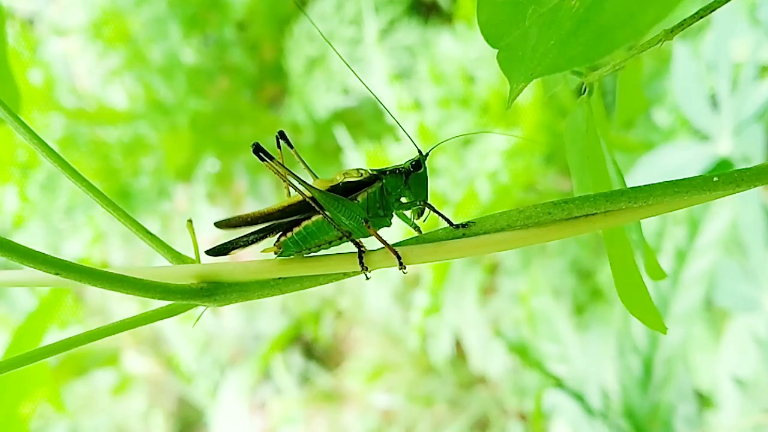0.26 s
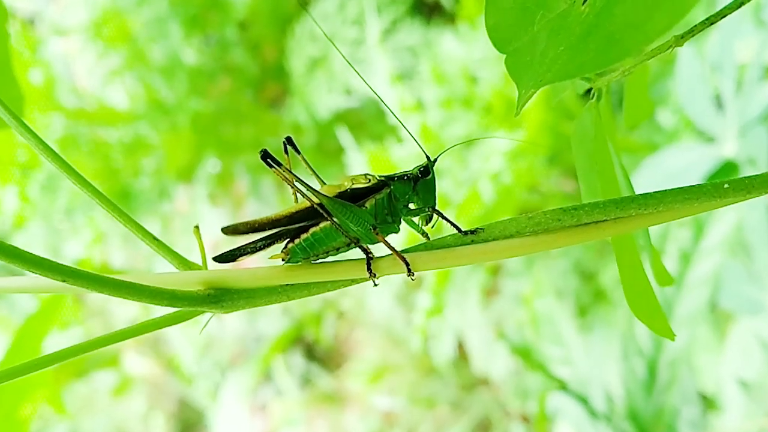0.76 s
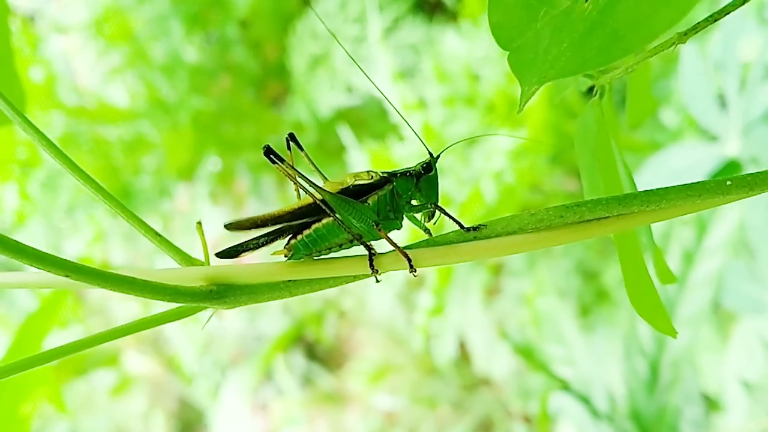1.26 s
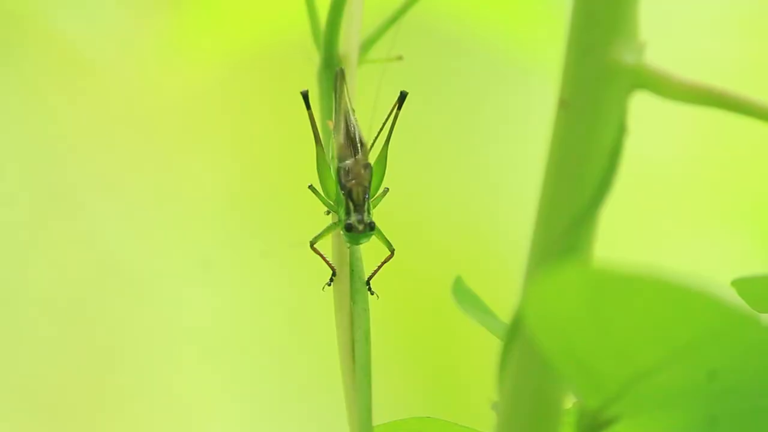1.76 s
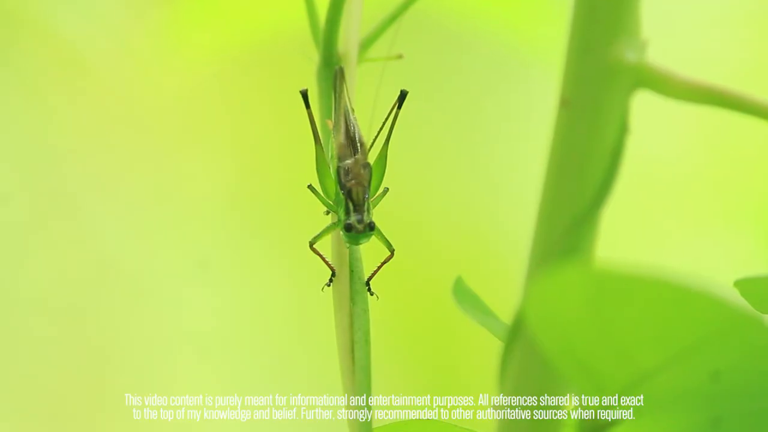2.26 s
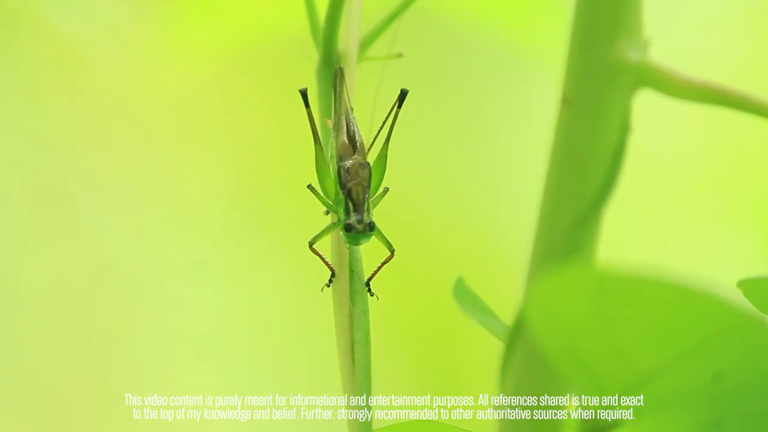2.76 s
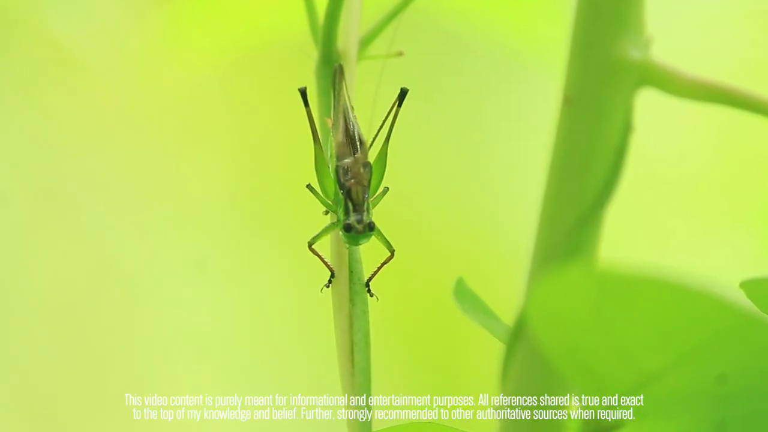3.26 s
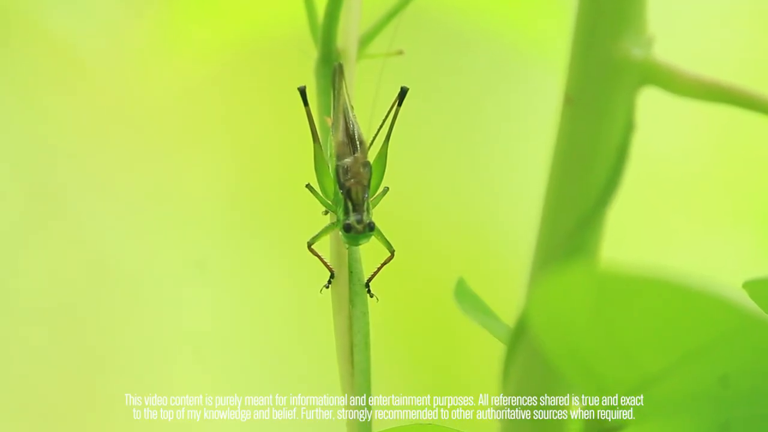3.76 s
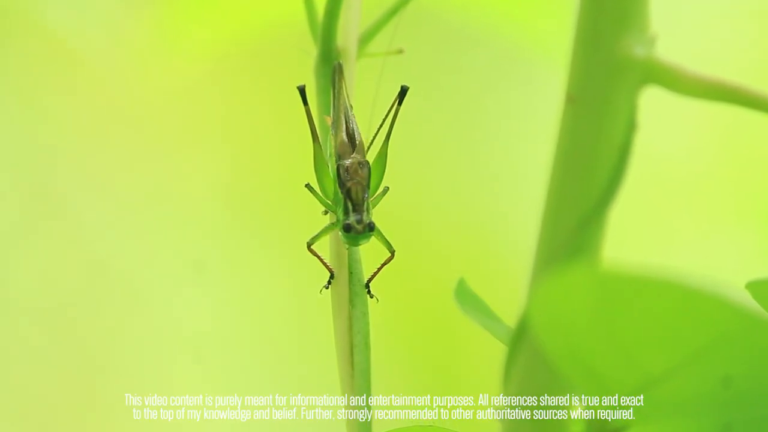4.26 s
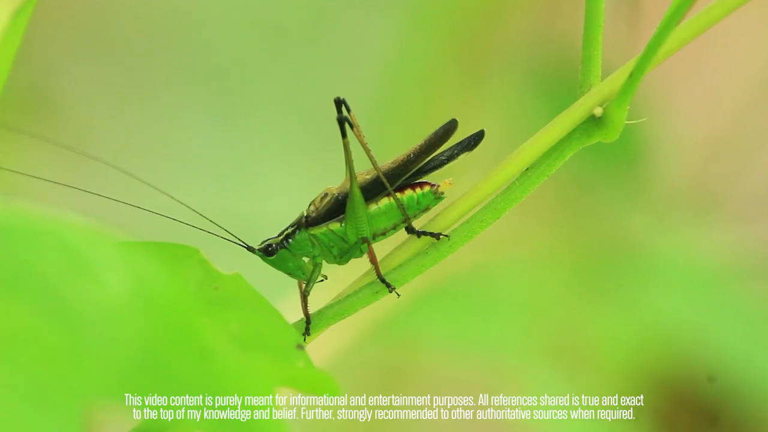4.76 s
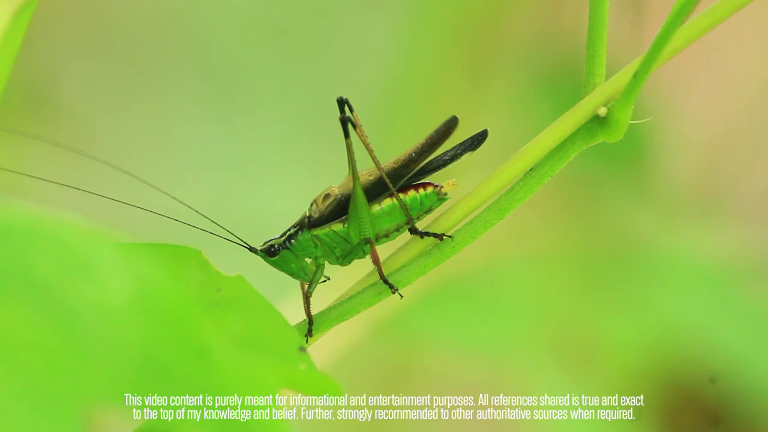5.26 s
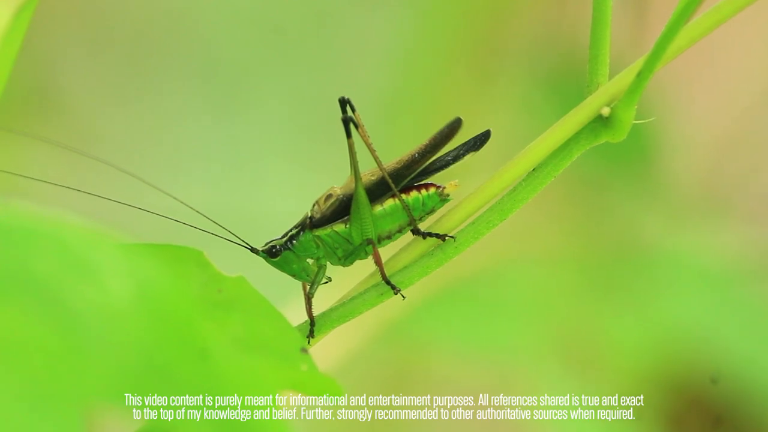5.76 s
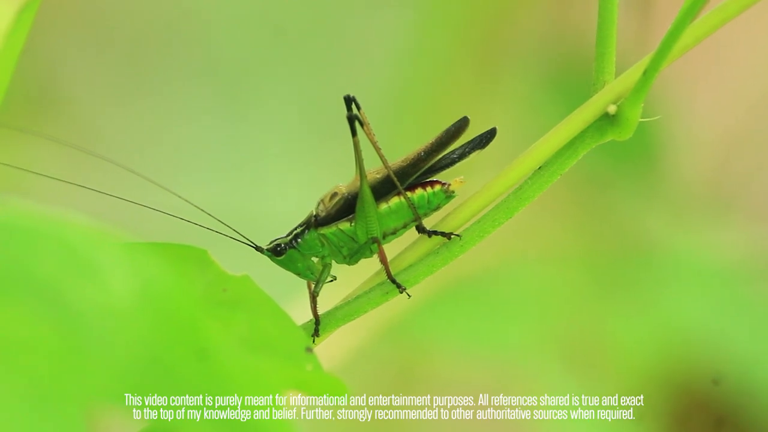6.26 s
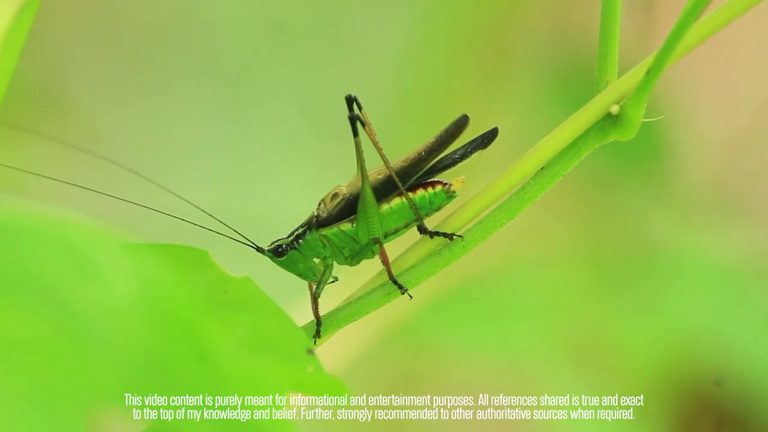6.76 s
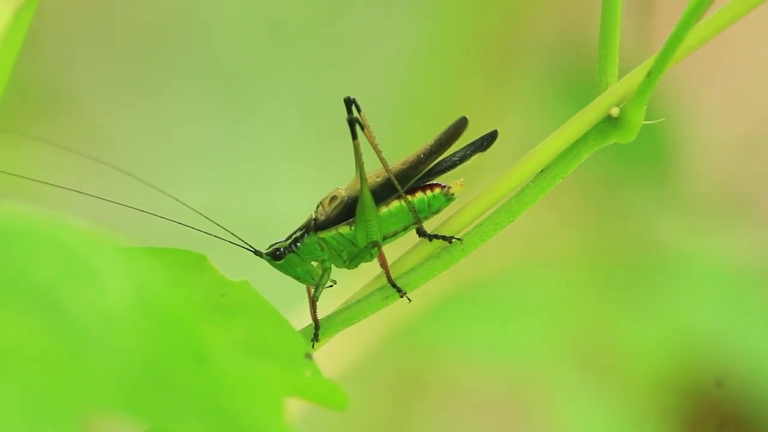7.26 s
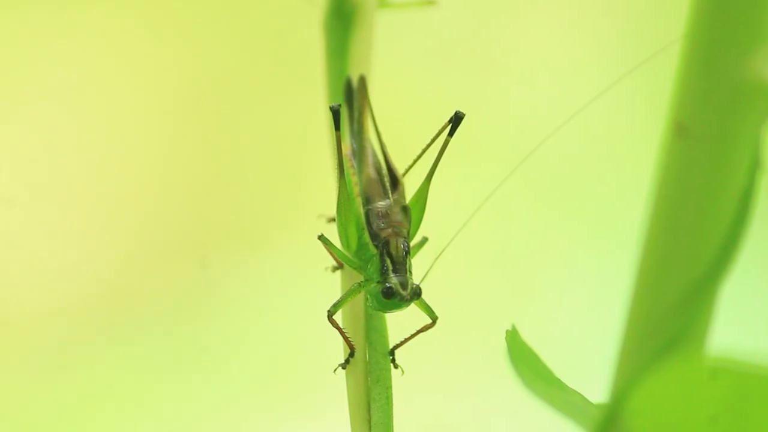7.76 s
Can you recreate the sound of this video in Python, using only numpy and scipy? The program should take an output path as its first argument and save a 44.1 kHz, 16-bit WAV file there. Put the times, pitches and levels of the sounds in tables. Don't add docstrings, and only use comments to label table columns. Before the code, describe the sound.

A katydid close by rasps a dry, shrill, continuous buzz of about 22 strokes a second over faint traffic, rustling leaves and far knocks.

```python
import sys
import numpy as np
from scipy import signal
from scipy.fft import rfft, irfft
from scipy.io import wavfile
from scipy.ndimage import uniform_filter1d, minimum_filter1d

SR = 44100
rng = np.random.default_rng(int(sys.argv[2]) if len(sys.argv) > 2 else 0)


def dump_mix(stems):
    frames = np.atleast_2d(stems).T
    limited = np.clip(frames, -1, 1)
    pcm = np.round(limited * 32767).astype(np.int16)
    wavfile.write(sys.argv[1], SR, pcm)


def how_loud(loudness_db):
    steps = np.asarray(loudness_db, float) / 20
    return 10 ** steps


N = 353020

# start_s, peak_db, pitch_hz
CATCHES = [(0.1188, -1.5, 13600), (0.3474, -3.5, 13100), (0.9005, -3, 13500), (1.0226, -11, 13500),
           (1.119, -5, 13700), (1.2642, -5, 13260), (1.401, -6, 13000), (1.4457, -6, 13400),
           (1.78, -15, 13500), (1.9277, -2, 13700), (1.9721, -6, 13900), (2.0694, -3, 13640),
           (2.1596, -6, 13600), (2.2105, -10, 13400), (2.3043, 2, 13900), (2.7185, -11, 13800),
           (2.7603, -4, 13500), (2.8053, -12, 13700), (2.8504, -14, 13800), (2.9436, -14, 12900),
           (3.0325, -6, 13700), (3.3555, -4, 13600), (3.639, 0, 13700), (3.7346, -8, 13200),
           (3.7695, -4, 13600), (4.0055, -15, 13900), (4.1448, -9, 13300), (4.3307, -23, 13350),
           (4.5527, -6, 13700), (4.7418, -14, 13600)]


def evened(x):
    return x / np.sqrt(np.mean(x ** 2) + 1e-20)


def steady(x, size):
    power = uniform_filter1d(uniform_filter1d(x ** 2, size), size)
    return x / np.sqrt(abs(power) + 1e-9)


def coloured(x, points):
    f, db = np.transpose(points)
    hz, z = np.fft.rfftfreq(N, 1 / SR) + 1, rfft(x)
    z = z / np.sqrt(uniform_filter1d(abs(z) ** 2, size=2000))
    shape_db = np.interp(np.log(hz), np.log(f), db, left=-90, right=-90)
    return evened(irfft(z * how_loud(shape_db), N))


def lower_part(x, hz, order):
    return signal.sosfiltfilt(signal.butter(order, hz, fs=SR, output="sos"), x)


def resonate(x, hz, width):
    turn = np.exp(2j * np.pi * np.cumsum(hz * np.ones(len(x))) / SR)
    r = np.exp(-np.pi * width / SR)
    return 2 * (turn * signal.lfilter([1 - r], [1, -r], x / turn)).real


def curve(rows, column):
    rows = np.array(rows)
    return np.interp(np.arange(N) / SR, rows[:, 0], rows[:, column])


def add(mix, s, sound):
    part = mix[round(s * SR):][:len(sound)]
    part += sound[:len(part)]


def bumps(rows, width_s):
    out, size = np.zeros(N + SR), int(width_s * SR)
    for s, db in rows:
        add(out, s - size / SR, db * np.bartlett(2 * size))
    return out[:N]


def wobble(hz):
    return evened(signal.lfilter(*signal.butter(2, hz, fs=SR), rng.standard_normal(N)))


def patches(frames, bins, long, wide):
    noise = rng.standard_normal((frames, bins))
    noise = uniform_filter1d(noise, size=long, axis=0)
    return evened(uniform_filter1d(noise, size=wide, axis=1)).T


def mottled(x, size, overlap, long, wide):
    z = signal.stft(x, nperseg=size, noverlap=overlap)[2]
    z = z * how_loud(2.2 * patches(*z.shape[::-1], long=long, wide=wide))
    return signal.istft(z, nperseg=size, noverlap=overlap)[1][:N]


def strokes():
    # stroke_share, low_wing_db, high_wing_db, mirror_db, gain_db
    bite = [
        (0, -1.5, -1.5, -1.5, 1.8),
        (.11, 3.8, 3, 1.5, 2.2),
        (.19, 3, 2.5, .5, 1.5),
        (.28, -1, 1, .2, -.8),
        (.39, 2.5, 1, 0, .5),
        (.52, -3, -1, 0, -2.5),
        (.65, 1.5, 0, 1, -.5),
        (.8, -4, -3.5, -2, -3),
        (.9, -5.5, -7, -7.5, -1.5),
    ]
    # time_s, strokes_made
    pace = [(.074, 0), (.4775, 9), (.617, 12), (.753, 15), (1.023, 21), (1.168, 24), (1.4444, 30),
            (1.589, 33), (2.018, 42), (2.298, 48), (2.574, 54), (2.8495, 60), (3.4, 72), (3.8145, 81),
            (4.236, 90), (4.646, 99), (4.97, 106)]
    # time_s, mirror_db
    effort = [(.07, -20), (.2, -20.5), (.45, -21.5), (.85, -21), (1.15, -24), (1.35, -21), (1.55, -23),
              (1.8, -20), (2.0, -22), (2.5, -21), (3.05, -22.5), (3.45, -23), (3.7, -23.5), (3.92, -26),
              (4.1, -24), (4.26, -24), (4.45, -24), (4.88, -22)]
    # time_s, mirror_db
    accents = [(0.244, 9.5), (0.407, 6), (0.547, 2), (0.591, 7), (0.605, 8.5), (0.697, 6), (0.738, 1),
               (0.835, 6), (0.869, 10), (0.918, 8.5), (0.965, -3), (1.05, 2.5), (1.121, -6), (1.14, 2),
               (1.239, 7), (1.266, 4), (1.283, 9.5), (1.341, 2), (1.375, 7), (1.448, 11), (1.66, 9),
               (1.803, 5.5), (1.854, 4), (1.926, 7), (2.007, -1), (2.069, 1.5), (2.109, 0), (2.167, 5.5),
               (2.217, 3.5), (2.238, 3), (2.285, 6), (2.317, 0), (2.38, 0), (2.605, 3), (2.658, 11),
               (2.726, 11.5), (3.01, 2), (3.189, 5.5), (3.328, 6), (3.439, 7), (3.487, 1), (3.539, 1.5),
               (3.571, 5), (3.646, 2.5), (3.67, 5), (3.702, 10.5), (3.8, 10), (3.833, 6.5), (3.856, 1),
               (3.931, 7), (4.033, 9), (4.071, 3), (4.176, 5), (4.328, 1), (4.348, 5), (4.406, 4),
               (4.553, -2), (4.623, 4), (4.755, 7.5), (4.81, 0),
               (0.104, -1), (0.155, -6), (0.216, -1.5), (0.3, -6.5), (0.331, -7), (0.388, -1.5), (0.626, 1),
             (0.653, -3), (0.669, -6.5), (0.761, -4), (0.811, 0), (0.991, -3.5), (1.01, -4.5), (1.159, -11),
             (1.174, -7), (1.214, -4), (1.361, -7), (1.431, -2), (1.478, -6), (1.507, -10), (1.526, -3),
             (1.59, -7), (1.644, -2.5), (1.747, -7.5), (1.766, -7), (1.839, -4), (1.907, -9), (1.963, -4),
             (2.037, -5), (2.132, -6), (2.199, -6), (2.518, -3), (2.586, 1.5), (2.622, -1), (2.672, -6.5),
             (2.794, -6), (2.82, -7.5), (3.09, -3), (3.173, -1.5), (3.206, -2.5), (3.264, -2), (3.403, 1),
             (3.599, 0), (3.627, -5), (3.685, -11), (3.986, -3.4), (4.101, -7), (4.137, -7.2), (4.201, -7),
             (4.234, -3.8), (4.249, -9.0), (4.27, -11), (4.293, -4), (4.31, -1), (4.379, -4), (4.514, -2),
             (4.538, -11), (4.566, -4), (4.729, -10), (4.866, -6)]
    # time_s, wing_db
    flexes = [(0.159, 2), (0.197, 4), (0.245, 0), (0.341, -6.5), (0.508, -5.5), (0.636, 1.5), (0.659, -1.5),
              (0.911, 2), (1.159, -1), (1.195, -3), (1.227, 4.5), (1.255, -0.5), (1.313, -2), (1.442, 1.5),
              (1.506, 0), (1.523, -5.5), (1.591, -4), (1.658, 1.5), (1.689, -4.2), (1.734, -5), (1.768, -6),
              (1.804, 0.5), (1.889, -2.5), (1.96, -9), (2.028, -4.3), (2.05, -3.5), (2.104, 2), (2.195, -1),
              (2.315, 4), (2.392, -5), (2.518, -3), (2.562, -2.5), (2.656, 1.5), (2.721, 6), (2.936, 4.5),
              (3.44, 6), (3.491, 5.5), (3.606, 4), (3.63, -3.5), (3.694, -1), (3.898, -7), (3.95, -7.5),
              (3.964, -0.5), (4.034, 2.5), (4.116, 4.5), (4.145, -5), (4.192, 1), (4.228, -7),
              (4.273, -1.5), (4.301, 4.5), (4.375, 0), (4.442, 4), (4.466, -3.4), (4.495, 6), (4.571, -2),
              (4.61, -4.5), (4.632, -2), (4.678, -3), (4.731, -8), (4.747, 1)]
    wing_db, wing_follows, wing_chance_db = -27.5, 0.17, -0.03
    bite_db, run_out_db, mirror_chance_db = 3.5, -2.5, -0.5
    press_s, catch_lift_db = .013, -0.5

    s, made = np.transpose(pace)
    count = np.interp(np.arange(N) / SR, s, made)
    at, *shapes = np.transpose(bite)
    low, high, mirror, gain = (1.12 * np.interp(count, at, shape, period=1) for shape in shapes)
    effort_db = curve(effort, column=1)
    chance = rng.standard_normal((int(made[-1]) + 1, 3))

    push_db = wing_db + wing_follows * (effort_db - effort_db.mean()) + bumps(flexes, press_s)
    push_db = push_db + wing_chance_db * uniform_filter1d(chance[count.astype(int), 0], size=200)

    marks = np.arange(len(chance))[:, None] + [.2, .66]
    marks_db = [bite_db, run_out_db] + mirror_chance_db * chance[:, 1:]
    slide_db = np.interp(count, marks.ravel(), marks_db.ravel())
    accent_db = bumps(accents, press_s)
    accent_db = accent_db + bumps([(s + 0.012, catch_lift_db) for s, *_ in CATCHES], 0.016)
    return push_db + low, push_db + high, effort_db + slide_db + accent_db + mirror, gain


def teeth(per_s, spread_db, blur_s):
    phase = np.cumsum(per_s * rng.uniform(.4, 1.6, N)) / SR
    hits = np.diff(np.floor(phase), prepend=0)
    hits = hits * how_loud(spread_db * rng.standard_normal(N))
    t = np.arange(1500) / SR
    smear = rng.standard_normal(len(t)) * np.exp(-t / blur_s)
    return signal.oaconvolve(hits, smear)[:N] + rng.standard_normal(N)


def katydid(low_db, high_db, mirror_db):
    # pitch_hz, density_db_per_hz
    wing_spectrum = [(4300, -50), (4900, -21), (5400, -16), (6100, -14.5), (6600, -11), (7100, -6),
                     (7700, -4), (8800, -1), (10000, -1), (10700, -3), (11500, -1), (12200, 0), (13000, -6),
                     (14500, -30)]
    # pitch_hz, density_db_per_hz
    mirror_spectrum = [(11300, -45), (11900, -26), (12300, -16.5), (12600, -12), (12900, -12),
                       (13200, -6.5), (13600, -1), (13850, 0), (14500, 0)]
    # pitch_hz, width_hz, level_db
    wing_rings = [(7730, 120, -21), (8200, 80, -25), (8760, 200, -19), (9990, 100, -23), (11580, 70, -24),
                  (6990, 70, -28)]
    # time_s, rim_over_core_db
    slack = [(.1, -6), (.39, -3), (.58, -8), (.75, -6), (.93, -5), (1.2, -5), (1.45, -7), (1.65, -5),
             (2.0, -6), (2.2, -5), (2.4, -6), (2.8, -6), (3.2, -6), (3.6, -6), (4.0, -7), (4.3, -5),
             (4.6, -6), (4.88, -7)]
    rim_follows = .8

    scrape = evened(teeth(2600, 2.34, 0.0016))
    scrape = mottled(scrape, 256, 192, long=14, wide=3)
    scrape = mottled(scrape, 1024, 512, long=2, wide=2)
    slips = how_loud(1.6 * wobble(130))

    wing = coloured(scrape, wing_spectrum)
    rings = sum(how_loud(db) * evened(resonate(wing, hz, width)) for hz, width, db in wing_rings)
    wing = steady(slips * (wing + rings), size=500)
    low = lower_part(wing, 8500, order=3)
    wing = low * how_loud(low_db - 0.85) + (wing - low) * how_loud(high_db + 2.04)

    mirror = slips * coloured(scrape, mirror_spectrum)
    rim = lower_part(mirror, 13150, order=8)
    core = mirror - rim
    slack_db = curve(slack, column=1)
    rim_db = (rim_follows - 1) * (mirror_db - mirror_db.mean())
    rim_db = rim_db + .8 * (slack_db - slack_db.mean())
    mirror = core.std() * steady(core, size=350) + rim.std() * steady(rim, size=500) * how_loud(rim_db - 0.25)
    return wing + how_loud(mirror_db + 6.5) * mirror


def garden():
    # pitch_hz, density_db_per_hz
    rumble_spectrum = [(12, -45), (20, -25.5), (60, -7.5), (87, -1), (105, -4), (150, -5), (199, -8),
                       (260, -14.5), (340, -32.5), (570, -120)]
    # pitch_hz, density_db_per_hz
    air_spectrum = [(130, -40.5), (220, -4.5), (399, -2.5), (438, -3.5), (548, -4.5), (1010, -7),
                    (1950, -6), (3100, -6), (3320, -7), (4620, -7.5), (5200, -8.5), (6760, -1.5),
                    (11400, -120)]
    # time_s, level_db, depth_db
    vehicles = [(.08, -46.5, -1.5), (.27, -53, -3.5), (.36, -46, -2), (.6, -44, -2), (.82, -48.5, -4.5),
                (1.01, -45.5, 3.5), (2.0, -46, 1.5), (2.07, -54, -2), (2.16, -48.5, 3.5), (2.6, -49, 3.5),
                (3.2, -50, 1.5), (3.5, -51.5, -1.5), (3.8, -47.5, -1.5), (4.03, -54.5, -2), (4.15, -46, -3),
                (4.45, -48, -3), (4.66, -46, 4.5), (4.88, -48, 4.5)]
    # time_s, level_db
    breeze = [(.1, -50), (.66, -51.5), (1.2, -50), (1.6, -52.5), (2.0, -51.5), (2.12, -53.5), (3.5, -55.5),
              (3.85, -52), (4.87, -52)]
    leaves_db, leaves_follow = -47.5, 0.11

    noise = rng.standard_normal((2, N))
    rumble, air = coloured(noise[0], rumble_spectrum), coloured(noise[1], air_spectrum)
    deep = lower_part(rumble, 110, order=2)
    murmur = lower_part(air, 1800, order=1)
    level_db, depth_db = curve(vehicles, column=1), curve(vehicles, column=2)
    breeze_db = curve(breeze, column=1)

    traffic = evened(deep) * how_loud(level_db + depth_db - 2.5)
    traffic = traffic + evened(rumble - deep) * how_loud(level_db - depth_db - 2.5)
    leaves_db = leaves_db + leaves_follow * (breeze_db - breeze_db.mean()) + .4 * wobble(3)
    rustle = how_loud(.8 * wobble(70))
    return traffic + rustle * (evened(murmur) * how_loud(breeze_db + 4.5) + evened(air - murmur) * how_loud(leaves_db))


def catches():
    out, t = np.zeros(N), np.arange(400) / SR
    flutter = 1 + .4 * np.cos(2 * np.pi * 500 * t)
    swell = (t / 0.0026 * np.exp(1 - t / .0024)) ** 2
    for s, db, hz in CATCHES:
        add(out, s - .0015, how_loud(db - 2.0) * swell * flutter * np.sin(2 * np.pi * hz * t) / 1.4)
    return out


def far_whistles():
    # start_s, length_s, start_hz, end_hz, level_db
    scrapes = [(0.15, 0.075, 3500, 3000, -44), (0.17, 0.074, 2100, 1900, -47), (0.13, .03, 2500, 2800, -46),
               (3.8, 0.15, 160, 130, -44), (3.8, .28, 180, 215, -51.5), (1.88, 0.2, 300, 460, -50),
               (3.9, 0.42, 380, 300, -56.5), (1.3, 0.05, 4100, 2000, -49.5), (4.33, .045, 3600, 2900, -46),
               (4.42, 0.045, 2700, 2400, -45), (4.42, 0.031, 3700, 3600, -49),
               (3.2, 0.047, 3600, 3900, -52.5), (4.515, 0.046, 900, 1700, -39.5),
               (4.52, 0.056, 1600, 2100, -43)]
    # start_s, length_s, start_hz, end_hz, level_db
    chirps = [
        (2.054, .088, 3350, 3300, -48),
        (2.191, 0.18, 3300, 3330, -53.5),
        (2.4, 0.47, 3350, 3310, -60),
        (2.802, 0.41, 3350, 3300, -56.5),
        (3.198, 0.46, 3360, 3350, -61),
        (3.578, 0.43, 3330, 3320, -57),
        (4.541, .26, 84, 88.6, -43.5),
        (4.661, 0.074, 2250, 2780, -52),
        (0.902, .75, 86.5, 87.8, -51),
        (1.901, .7, 85, 110, -51),
    ]
    out = np.zeros(N)
    for rows, share in [(scrapes, .4), (chirps, .045)]:
        for s, length, hz0, hz1, db in rows:
            size, width = int(length * SR), share * (hz0 + hz1) / 2
            glide = np.linspace(hz0, hz1, size)
            whistle = resonate(rng.standard_normal(size), glide, width)
            whistle = resonate(whistle, glide, width)
            add(out, s, how_loud(db) * evened(whistle) * signal.windows.tukey(size, .5))
    return out


def far_knocks():
    # start_s, peak_db, pitch_hz, t60_s
    knocks = [
        (1.167, -27.5, 1756, 0.14),
        (1.197, -33.5, 1880, 0.11),
        (1.22, -33, 1900, 0.25),
        (1.5388, -26, 1803, 0.11),
        (1.5857, -34.5, 2006, 0.16),
        (1.728, -23, 1846, 0.19),
        (1.7828, -34.5, 1925, 0.16),
        (2.0399, -32.5, 1862, 0.16),
    ]
    # pitch_ratio, level_db
    knock_modes = [(.53, -11), (.72, -9), (1.0, 0), (1.07, -4)]
    out, t = np.zeros(N), np.arange(SR // 3) / SR
    for s, db, hz, t60 in knocks:
        drive = rng.standard_normal(len(t)) * how_loud(-60 * t / t60) + 25 * (t == 0)
        ring = sum(how_loud(d) * evened(resonate(drive, hz * k, 34)) for k, d in knock_modes)
        ring = ring + how_loud(-15.5) * evened(resonate(drive, hz, 900))
        add(out, s - .003, how_loud(db + 2.5) * ring / abs(ring).max())
    return out


def scene():
    *song_db, gain_db = strokes()
    background = garden() + far_whistles() + far_knocks()
    return (katydid(*song_db) + catches() + how_loud(gain_db) * background)[None]


def limited(x):
    top = -minimum_filter1d(-abs(x), size=201)
    return x / uniform_filter1d(np.maximum(top / .88, 1), size=101)


def rounded_lines(x):
    # pitch_hz, step_over_usual_line_db
    coarseness = [(500, -10), (1500, 0), (2200, 3.5), (3000, 7), (3300, 5), (3800, 7), (4400, 6),
                  (4700, 12), (4950, 7), (6500, 7), (7000, 2), (8000, -4)]
    # time_s, level_db
    spills = [(.09, -24), (.35, -36), (.79, -30), (.88, -34), (1.03, -32), (1.07, -36), (1.17, -36),
              (1.27, -22), (1.4, -32), (1.45, -18), (1.54, -30), (1.6, -36), (1.73, -32), (1.78, -32),
              (2.06, -22), (2.09, -34), (2.31, -30), (3.08, -32), (3.14, -26), (3.37, -28), (4.0, -36),
              (4.29, -26), (4.46, -30), (4.54, -22), (4.63, -26), (4.73, -26), (4.87, -24)]
    size, lead, edge_hz = 1024, 300, 13925
    n, k = np.arange(2 * size) + .5, np.arange(size) + .5
    window = signal.windows.kaiser_bessel_derived(2 * size, beta=4 * np.pi)
    basis = window[:, None] * np.cos(np.pi / size * np.outer(n + size / 2, k))
    blocks = np.pad(x, (size + lead, 2 * size - (N + lead) % size)).reshape(-1, size)
    lines = np.hstack([blocks[:-1], blocks[1:]]) @ basis
    hz = k * SR / (2 * size)

    log_lines = uniform_filter1d(np.log(abs(lines) + 1e-9), size=45, axis=0)
    usual = 1.8 * np.exp(uniform_filter1d(log_lines, size=9, axis=1))
    step_db = np.interp(hz, *np.transpose(coarseness)) + 2.0 * patches(*lines.shape, long=3, wide=5).T
    step = usual * how_loud(step_db)
    lines = np.sign(lines) * step * np.floor(abs(lines) / step + .42)

    spill_db = -56 + 6.0 * rng.standard_normal((len(lines), 1))
    at, db = np.transpose(spills)
    spill_db[np.round((at * SR + lead) / size).astype(int), 0] = db + 9
    spill_db = spill_db - 0.062 * (hz - edge_hz)
    lines = lines * np.where(hz > edge_hz, how_loud(np.minimum(spill_db, 0)), 1)
    frames = lines @ basis.T * 2 / size
    return (frames[:-1, size:] + frames[1:, :size]).ravel()[lead:lead + N]


def top_cut(x):
    return signal.sosfilt(signal.butter(12, 15280, fs=SR, output="sos"), x)


def record(dry):
    x = rounded_lines(limited(dry[0]))[None]
    start, loop = 3062, 212314
    t = np.arange(loop) / SR
    fade = np.clip(np.minimum(t / 0.0021, (t[-1] - t) / .0015), 0, 1)
    piece = x[:, start:start + loop] * np.sin(np.pi / 2 * fade) ** 2
    mix = np.concatenate([np.zeros((1, start)), piece, piece], axis=1)[:, :N]
    return top_cut(mix)


dry = scene()
out = record(dry)
dump_mix(out)
```